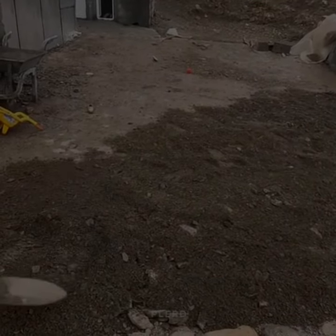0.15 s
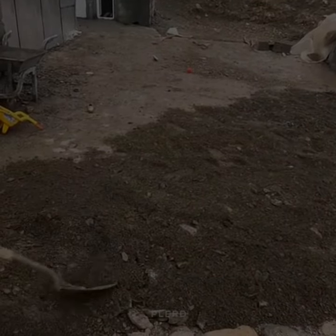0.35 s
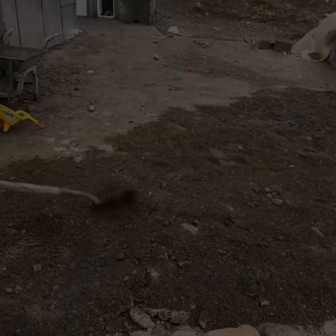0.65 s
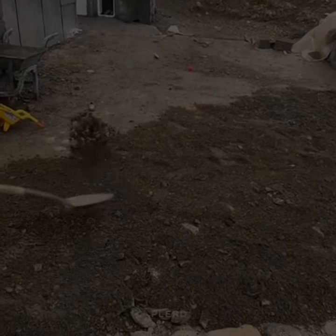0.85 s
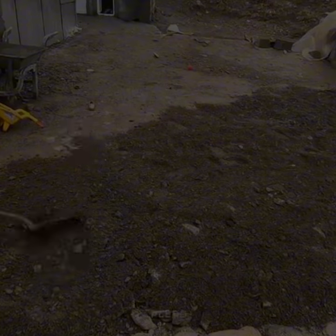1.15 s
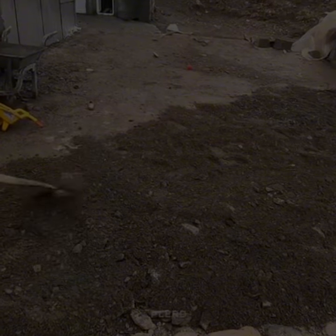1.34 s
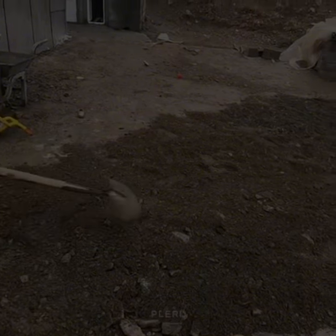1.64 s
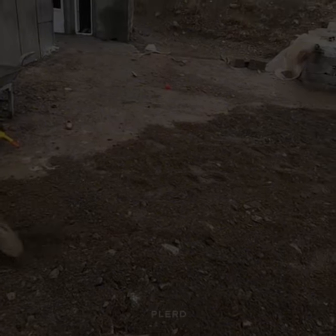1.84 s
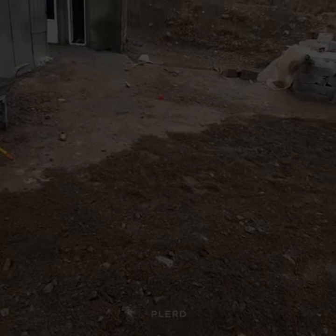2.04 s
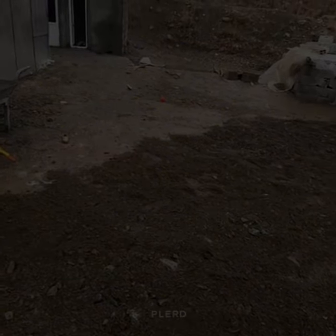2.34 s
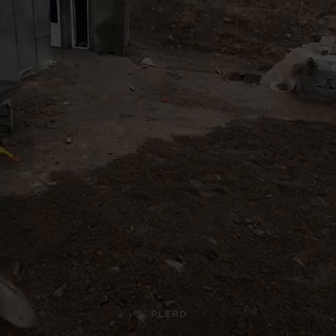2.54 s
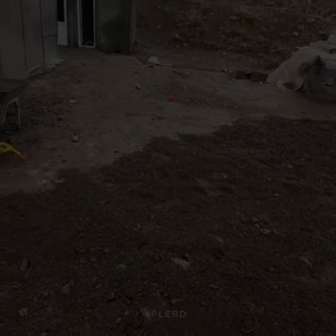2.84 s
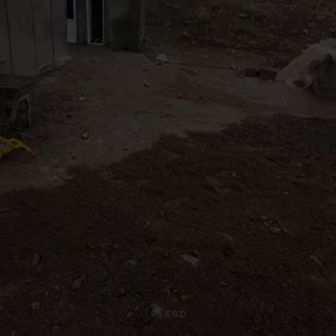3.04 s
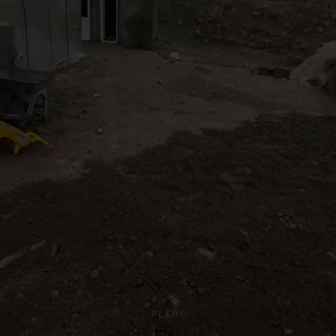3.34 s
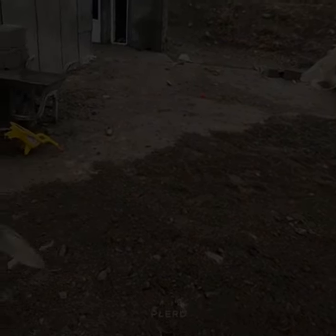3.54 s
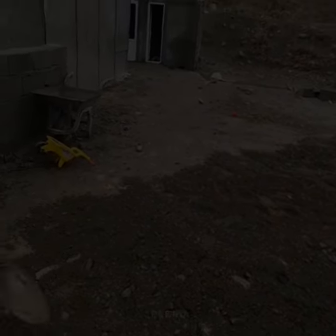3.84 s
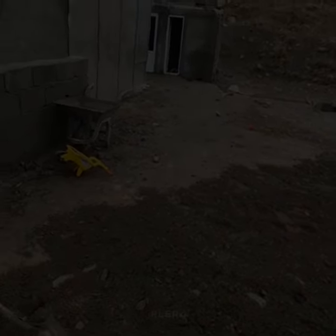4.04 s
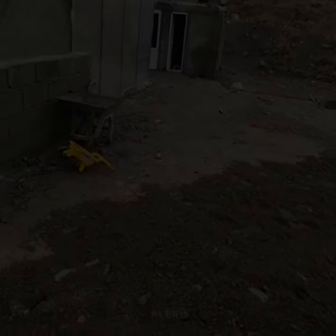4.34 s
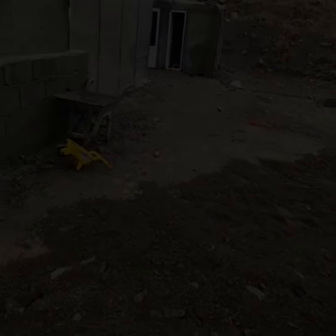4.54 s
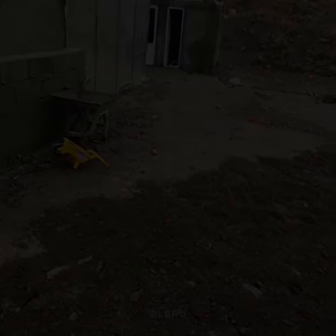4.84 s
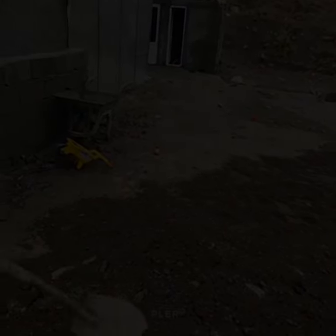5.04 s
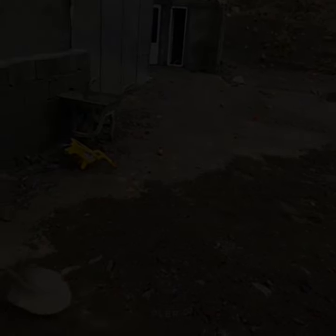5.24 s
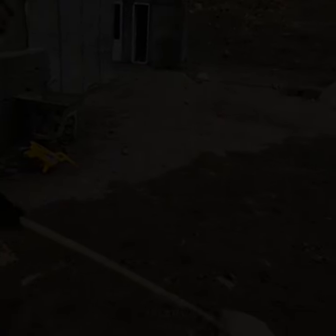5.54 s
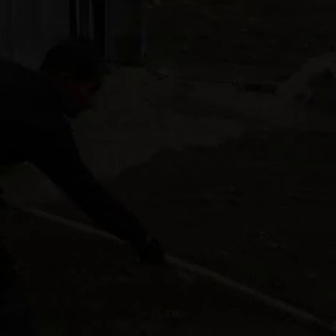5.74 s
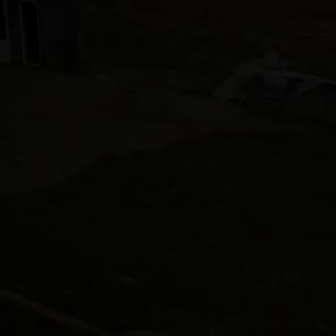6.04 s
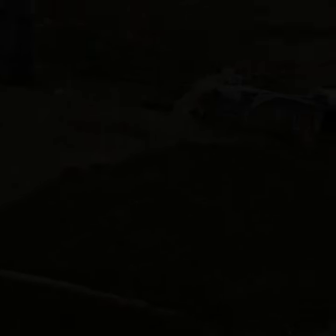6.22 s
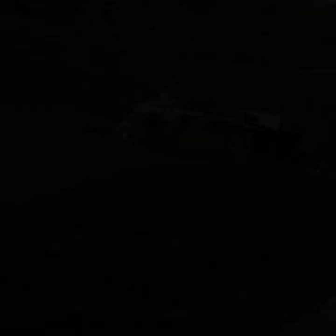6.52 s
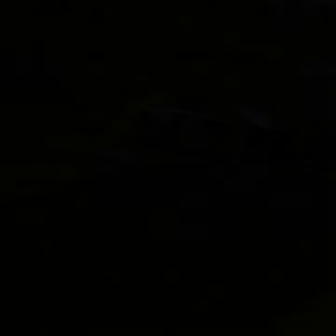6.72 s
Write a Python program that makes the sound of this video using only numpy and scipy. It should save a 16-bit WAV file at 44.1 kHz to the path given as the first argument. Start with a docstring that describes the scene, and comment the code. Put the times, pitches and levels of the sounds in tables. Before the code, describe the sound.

A shovel tosses loose earth that patters down, then crunches through gravelly soil, stones clicking on steel, ending in a long gritty scrape.

```python
"""Shovel in gravelly soil

A steel shovel works gravelly soil in an open yard, a few steps from the microphone.
First loose earth is tossed and lands with a dull patter; then the gravel crunches in short bursts,
stones click on the blade, and near the end a long scrape drags grit over the ground.
Contacts are filtered noise and tiny impulses; the ringing steel and soft thumps are decaying sines."""
import sys
import numpy as np
from scipy import signal
from scipy.fft import rfft, irfft, next_fast_len
from scipy.io import wavfile
from scipy.ndimage import uniform_filter1d, map_coordinates

SR = 44100
rng = np.random.default_rng(int(sys.argv[2]) if len(sys.argv) > 2 else 0)


def master_out(mix):
    """Clip the mix to full scale and print it as 16-bit PCM to the path in sys.argv[1]."""
    frames = np.transpose(np.atleast_2d(mix))
    ceiling = np.clip(frames, -1, 1)
    pcm = np.round(ceiling * 32767).astype(np.int16)
    wavfile.write(sys.argv[1], SR, pcm)


N = 303259

# The blade bites into gravel, and a stone may snap at the peak. Each row: peak time in seconds,
# relative level in dB, rise and fall in seconds per 60 dB, snap in dB over the level,
# relative thud, knock and grit in dB, stone resonance in Hz.
GRAVEL_BITES = [(0.028, -40, .05, .07, -10, 14, 2, 1, 2400), (1.463, -35, .03, .07, 14, -7, -4, -8, 1824),
                (1.598, -38, .045, .06, -11, -10, -1, -5, 2196), (1.834, -23, .04, .09, 1, -8, 0, 0, 2946),
                (1.944, -32, .045, .06, -11, -12, -4, -4, 1732),
                (1.997, -36, .06, .12, -10, 0, -7, 0, 2176), (2.143, -43, .04, .09, -8, -6, -2, 4, 4500),
                (2.311, -33, .035, .06, -10, 0, 0, 1, 1800), (2.423, -39, .04, .07, -8, -4, -3, 1, 2730),
                (2.465, -39, .03, .1, -8, -4, -3, 0, 1610), (2.683, -25, .028, .06, 2, -3, -5, 1, 2215),
                (3.077, -24, .045, .05, -8, 4, -1, 1, 1750), (3.114, -23, .026, .05, -10, -6, -4, -1, 1914),
                (3.128, -24, .06, .04, -5, 5, 1, -12, 2500), (3.375, -20, .036, .05, 4, -6, -2, -2, 2190),
                (3.389, -22.5, .06, .045, -11, -10, -9, -2, 1900),
                (3.435, -16, .045, .06, 0, 1, -2, -1, 2500), (3.479, -30, .034, .04, 0, 11, 7, -7, 1750),
                (3.736, -23, .06, .055, -2, -12, -3, -3, 2700),
                (3.772, -23, .04, .06, -3, -14, -3, -3, 1836),
                (4.095, -30, .025, .04, -10, -10, -6, 6, 2150), (4.108, -26, .04, .035, 6, -5, -5, 5, 2147),
                (4.213, -36, .025, .06, -6, -12, -1, -2, 1850), (4.2637, -20, .06, .05, 9, 7, 2, -4, 2040),
                (4.672, -16, .04, .06, -6, 14, 2, -2, 1800), (4.682, -18, .035, .045, -6, 11, 1, -5, 2460),
                (4.879, -24, .035, .05, -10, -2, 2, -4, 1750), (4.8855, -20, .012, .05, 7, 3, 0, -5, 3230),
                (5.202, -23, .05, .08, 1, -1, -5, 4, 4210), (5.259, -40, .12, .13, -12, -2, 2, -1, 1800),
                (5.5603, -25, .06, .05, 10, -8, 8, 1, 1000), (5.606, -36, .04, .2, -12, -10, -3, -2, 2700),
                (5.706, -31, .04, .16, -10, -4, 0, -1, 2700), (5.846, -25, .034, .05, 8, 0, 4, -3, 2434),
                (5.984, -26, .03, .1, -8, -1, 0, 0, 3430), (6.065, -26, .02, .07, -6, -15, -10, 1, 1770),
                (6.227, -31, .06, .07, -6, 1, 1, 5, 7700), (6.294, -25, .03, .09, 7, -14, -2, 3, 4400),
                (6.332, -20, .016, .085, -2, 3, 8, -3, 1820), (6.512, -26, .12, .06, -2, -18, -2, 2, 1616)]


def crunches():
    """Gravel gives way under the blade in short bursts, with a brighter snap where the load peaks."""
    out = np.zeros((2, N))
    for s, db, rise, fall, snap_db, thud_db, knock_db, grit_db, stone_hz in GRAVEL_BITES:
        tone = stones(thud_db, knock_db, grit_db, stone_hz, peak_db=6.0, width_hz=170, uneven_db=3.5)
        crunch = colour(burst(db - 2, rise, fall), tone)
        add(out, s - rise, crunch)
        add(out, s, snap(db + snap_db, thud_db, knock_db, grit_db + 2.1, stone_hz))
    return out


def burst(db, rise, fall):
    """A cloud of fractures that swells for rise seconds and dies."""
    t = np.arange(-rise, fall + .02, 1 / SR)
    swell = amp(db - 60 * np.maximum(-t / rise, t / fall))
    cloud = fractures(SR // 2, rate=5500, scatter_db=3.5, dust=0.562)[:, :len(t)]
    return spread(cloud, side_db=-8) * swell[:SR // 2]


SNAP_S = 0.013  # chatter of a snap, seconds per 60 dB


def snap(db, thud_db, knock_db, grit_db, stone_hz):
    """A stone snaps: one sharp push and a few milliseconds of chatter."""
    t = np.arange(SR // 20) / SR
    chatter = rng.standard_normal((2, len(t))) * amp(-3 - 60 * t / SNAP_S)
    chatter[0, 0] -= 3.5  # the sharp push, common to both sides
    tone = stones(thud_db, knock_db, grit_db, stone_hz, peak_db=6.5, width_hz=238, uneven_db=3.0)
    return colour(amp(db - 1) * spread(chatter, side_db=-10), tone)


# Basic colour of gravel contacts. Each row: frequency in Hz, relative gain in dB.
GRAVEL_COLOUR = [(30, -31.5), (80, -17.5), (150, 1.5), (300, 0), (520, 0), (800, -0.5), (2100, 1),
                 (3400, -2), (5400, -7), (6600, -6), (7900, -3.5), (8700, -10.5), (9800, -24.5),
                 (13000, -31.5), (15700, -46.5)]


def stones(thud_db, knock_db, grit_db, stone_hz, peak_db, width_hz, uneven_db):
    """Colour of one contact: ground thud, bright grit, one main resonance and many chance ones."""
    tilt = [(200, thud_db), (420, (thud_db + knock_db) / 2), (650, knock_db), (1100, knock_db),
            (1700, 0), (3800, 0), (5500, grit_db)]
    chance = rng.standard_normal(256)
    half_width = width_hz * np.sqrt(stone_hz / 2000)

    def level(hz):
        resonance = peak_db / (1 + ((hz - stone_hz) / half_width) ** 2)
        # small stones have no low resonances
        ripple_db = uneven_db * np.minimum(hz / 1800, 1)
        ripple = ripple_db * map_coordinates(chance, [hz / 130], mode="wrap")
        return along(GRAVEL_COLOUR, hz) + along(tilt, hz) + resonance + ripple

    return level


CLICK_THUD_DB = -7.5  # a lone stone hardly shakes the ground
# Lone stones striking. Each row: start in seconds, relative level in dB,
# relative knock and grit in dB, stone resonance in Hz.
STONE_CLICKS = [(0.37, -32, -2, -6, 3000), (0.438, -38, 0, -12, 2900), (0.612, -40, -2, -8, 3100),
                (0.732, -32, 0, -12, 3560), (0.753, -38, 0, -12, 2600), (1.018, -37, 0, -8, 3600),
                (1.074, -25, -6, -16, 3130), (1.15, -22, 5, -14, 2900), (1.838, -18, -2, 0, 2950),
                (2.432, -33, -8, 5, 5600), (2.715, -24, -7, 1, 3290), (3.938, -39, -1, 7, 5600),
                (4.161, -36, -8, 7, 6800), (4.27, -19, 6, -4, 1300), (5.578, -24, 13, 0, 1100),
                (5.883, -21, -1, -1, 4300), (6.289, -18, -12, 3, 3900), (6.329, -14, 5, -8, 2400),
                (6.5665, -10, -14, 2, 3980), (6.595, -17, -13, 8, 4200)]


def clicks():
    """Lone stones strike the blade or each other, each with one snap."""
    out = np.zeros((2, N))
    for s, db, knock_db, grit_db, stone_hz in STONE_CLICKS:
        add(out, s, snap(db, CLICK_THUD_DB, knock_db, grit_db, stone_hz))
    return out


BLOW_S = .045  # the ground's shudder, seconds per 60 dB
# Hard blows of the blade on firm ground, which also ring the steel in blade().
# Each row: start in seconds, relative ring in dB, relative thud in dB.
HARD_BLOWS = [(4.264, -50, -8), (4.676, -48, -3), (4.886, -34, 4), (5.203, -41.5, -24), (5.561, -38.5, -16),
              (6.33, -48.5, -18), (6.566, -39.5, -27.5)]
# Colour of the struck ground. Each row: frequency in Hz, relative gain in dB.
THUD_COLOUR = [(40, -25.5), (100, -8.5), (170, 4), (270, 7), (420, 1), (900, -4.5), (2000, -17),
               (6000, -16.5), (12000, -58)]


def thuds():
    """A hard blow gives the ground one heavy push and a short shudder."""
    out, t = np.zeros((2, N)), np.arange(SR // 12) / SR
    for s, ring_db, thud_db in HARD_BLOWS:
        push = rng.standard_normal((2, len(t))) * amp(-18 - 60 * t / BLOW_S)
        push[0, 0] += 3.5  # the heavy push, common to both sides
        thud = colour(amp(thud_db) * spread(push, side_db=-11), lambda hz: along(THUD_COLOUR, hz))
        add(out, s, thud)
    return out


# The blade grinds over a stone and sings. Each row: peak time in seconds, relative level in dB,
# rise and fall of the driving noise in seconds per 60 dB, favoured frequency in Hz.
STONE_GRINDS = [(1.073, -42, .04, .05, 3130), (1.832, -40, .04, .2, 3130), (3.113, -34, .02, .09, 1860),
                (3.371, -26, .03, .05, 1250), (3.386, -27, .06, .045, 2240), (3.434, -30, .04, .09, 3455),
                (3.736, -33, .06, .04, 2240), (3.774, -35, .04, .05, 1860), (4.095, -36, .03, .07, 7910),
                (4.874, -26.5, .04, .08, 3200), (5.21, -44, .05, .3, 4390), (5.574, -32, .1, .08, 860),
                (5.996, -39, .06, .08, 715), (6.51, -35, .1, .05, 1650)]


def blade():
    """The steel sings in damped bursts as it grinds over stones, and rings freely after hard blows."""
    out = np.zeros((2, N))
    for s, db, rise, fall, focus_hz in STONE_GRINDS:
        ring = blade_ring(focus_hz, SOIL_DAMPING)
        add(out, s - rise, signal.fftconvolve(burst(db, rise, fall), ring, axes=1))
    for s, ring_db, thud_db in HARD_BLOWS:
        ring = blade_ring(focus_hz=1600, damping=1)
        add(out, s, amp(ring_db + 4) * ring / np.abs(ring).max())
    return out


FOCUS_DB_PER_OCTAVE = 28  # the point of contact picks out the modes near one frequency
SOIL_DAMPING = 1.7  # how much faster the blade dies away when pressed into the ground
# Modes of the steel blade. Each row: frequency in Hz, relative level in dB,
# free decay in seconds per 60 dB.
BLADE_MODES = [(715, -3, .07), (860, -3, .06), (1210, -2, .07), (1600, 1, .14), (1860, -1, .06),
               (2240, 0, .07), (3130, -2, .04), (3290, -1, .06), (3455, -1, .06), (4390, -1, .08),
               (7910, -2, .04)]


def blade_ring(focus_hz, damping):
    """Ring of the blade, of energy 1, touched where the modes near focus_hz answer best."""
    t = np.arange(SR // 5) / SR
    ring = np.zeros(len(t))
    for hz, db, t60 in BLADE_MODES:
        level = db + rng.normal(0, 1.5) - FOCUS_DB_PER_OCTAVE * abs(np.log2(hz / focus_hz))
        ring += amp(level - 60 * t * damping / t60) * np.sin(2 * np.pi * hz * t)
    return ring[None] / np.linalg.norm(ring)


# Colour of running soil. Each row: frequency in Hz, relative gain in dB.
SOIL_COLOUR = [(100, -14.5), (400, -5), (900, -2), (1300, 0), (2000, 0), (3200, -0.5), (4500, -3.5),
               (6200, -9.5), (7500, -24.5), (10000, -31.5), (13000, -27.5), (15700, -53.5)]
# Colour of fine grit. Each row: frequency in Hz, relative gain in dB.
GRIT_COLOUR = [(1000, -33.5), (3500, -11.5), (5400, -6.5), (6600, -4.5), (7900, -2), (8600, -8.5),
               (9800, -24.5), (13000, -30.5), (15700, -44.5)]
# Resonances of the loaded blade under a scrape. Each row: frequency in Hz, half-width in Hz, boost in dB.
SCRAPE_MODES = [(556, 21.5, 2), (712, 30, 5), (1794, 84, 5.5), (2273, 70, 5), (2690, 34, 3),
                (3230, 94, 3.5), (4284, 54, 2.5), (7680, 150, 1.5)]


def sliding(soil_gain, grit_gain):
    """Earth and fine grit run over the blade and the ground in uneven clumps."""
    clumps_db = 2.0 * wobble(35) + 1.92 * wobble(260)
    soil = spread(fractures(N, rate=900, scatter_db=4.5, dust=0.6), side_db=-4.5)
    soil = soil * soil_gain * amp(clumps_db - 2.5)
    grit = spread(fractures(N, rate=1200, scatter_db=4, dust=0.7), side_db=-6.5)
    grit = grit * grit_gain * amp(clumps_db - 1.5)

    def steel(hz):
        return sum(db / (1 + ((hz - centre) / width) ** 2) for centre, width, db in SCRAPE_MODES)

    soil = colour(soil, lambda hz: along(SOIL_COLOUR, hz) + steel(hz))
    grit = colour(grit, lambda hz: along(GRIT_COLOUR, hz) + steel(hz))
    return shifting(soil + grit, depth_db=3.0)


def shifting(x, depth_db):
    """Changing contacts bring out narrow resonances for a few hundredths of a second each."""
    z = signal.stft(x, nperseg=512)[2]
    field = uniform_filter1d(rng.standard_normal(z.shape[1:]), size=2, axis=0)  # blur over frequency
    field = uniform_filter1d(field, size=8, axis=1)  # blur over time
    return signal.istft(z * amp(depth_db * unit(field)), nperseg=512)[1][:, :N]


DIG_START_S = 1.46
TRICKLE_DB, TRICKLE_GRIT_DB = -61.5, -68  # relative: soil and grit that keep trickling while digging
CONTACT_DB, CONTACT_GRIT_DB = -44.5, -43  # relative: while the blade stays down between pushes
POUR_RISE_S, POUR_FALL_S = 0.152, 0.361  # seconds per 60 dB: material starts to run, and runs out
POUR_SAG_DB_PER_S = 20  # a spill thins out as the load runs down
# A push takes these seconds per 60 dB to start and stop, and loses force as it goes.
PUSH_RISE_S, PUSH_FALL_S, PUSH_SAG_DB_PER_S = .07, .19, 42
# Gravelly soil spills off the blade. Each row: start in seconds, length in seconds,
# relative level in dB, fine grit in dB over the level.
SOIL_SPILLS = [(1.475, 0.093, -55, -3), (1.854, 0.0315, -43.5, -2.5), (1.951, 0.059, -53, 2),
               (2.097, 0.0685, -54.5, 1.5), (2.337, 0.1434, -49.5, 0), (2.423, 0.039, -49.5, 3.5),
               (2.717, .07, -48.5, 1.5), (2.88, 0.07, -46.5, -2), (3.042, 0.1186, -52.5, 3),
               (3.781, 0.051, -53.5, 0), (4.15, .13, -51, -0.5), (4.41, 0.019, -50, 2),
               (4.485, .025, -45, 2), (5.101, 0.031, -68.5, 8.5), (5.214, 0.0332, -43, 0),
               (5.424, 0.195, -55.5, 2.5), (6.779, .1, -56.5, 3)]
# Pushes of the long scrape. Each row: start in seconds, length in seconds,
# relative level in dB, fine grit in dB over the level.
SCRAPE_PUSHES = [(5.57, .1, -38, 0), (5.705, .09, -34.5, 4), (5.94, .07, -40, 2), (6.06, .08, -35.5, 7),
                 (6.215, .06, -37, 7), (6.3, .06, -36, 5), (6.47, .11, -40, 5), (6.62, .065, -36.5, 4)]


def flow():
    """Gains of moving soil and fine grit: a steady trickle, the spills and the pushes of the long scrape."""
    trickle = pour(DIG_START_S, N / SR, POUR_RISE_S, POUR_FALL_S)
    first, last = SCRAPE_PUSHES[0][0], SCRAPE_PUSHES[-1][0]
    contact = pour(first, last - first, PUSH_RISE_S, PUSH_FALL_S)
    parts = [trickle * amp([[TRICKLE_DB], [TRICKLE_GRIT_DB]]),
             contact * amp([[CONTACT_DB], [CONTACT_GRIT_DB]])]
    for s, length, db, grit_db in SOIL_SPILLS:
        spill = pour(s, length, POUR_RISE_S, POUR_FALL_S, POUR_SAG_DB_PER_S)
        parts.append(spill * amp([[db], [db + grit_db]]))
    for s, length, db, grit_db in SCRAPE_PUSHES:
        push = pour(s, length, PUSH_RISE_S, PUSH_FALL_S, PUSH_SAG_DB_PER_S)
        parts.append(push * amp([[db], [db + grit_db]]))
    return np.sqrt(sum(part ** 2 for part in parts))


def pour(s, length, rise, fall, sag=0):
    """Gain of running material: it swells up to time s, sags by sag dB a second for length and runs out."""
    t = np.arange(N) / SR - s
    edges = np.clip(np.maximum(-t / rise, (t - length) / fall), 0, 2)
    return amp(-60 * edges - sag * np.clip(t, 0, length))


def pebbles(soil_gain, count=120):
    """Loose pebbles tick here and there, louder when more soil is moving."""
    out, t = np.zeros((2, N)), np.arange(SR // 50) / SR
    for when, weight, pitch in rng.random((count, 3)):
        tick = spread(rng.standard_normal((2, len(t))), side_db=-12) * amp(-60 * t / 0.0063)
        level = soil_gain[int(when * N)] * amp(2 + 8 * weight)
        tone = stones(-13, -2, 2.07, 1600 + 4000 * pitch, peak_db=8, width_hz=290, uneven_db=4)
        add(out, when * N / SR, colour(level * tick, tone))
    return out


CRUMBS_DB, CRUMBS_S = -56.5, 1.36  # relative level of crumbs that keep falling, and for how long
TOSS_RISE_S, TOSS_FALL_S = .1, .2  # seconds per 60 dB: tossed earth starts and stops landing
CLOD_RISE = .42  # share of a clod's length spent swelling
# Tossed earth comes down. Each row: start in seconds, length in seconds, relative level in dB.
EARTH_TOSSES = [(0.0, .032, -50), (0.125, .065, -50), (0.32, .08, -43), (0.445, .09, -43),
                (0.618, .025, -51), (0.79, .065, -50), (1.06, .07, -47), (1.157, .028, -38.5),
                (1.2, .035, -45.5), (1.33, .025, -51)]
# Clods of tossed earth landing. Each row: peak time in seconds, relative level in dB,
# length in seconds per 60 dB (a negative length is silent), relative weight in dB.
EARTH_CLODS = [(0.37, -37, .25, 3), (0.732, -42.5, 0.37, 5), (1.02, -39.5, -0.86, 5), (1.104, -30, .035, 7),
               (1.114, -27, .07, 6)]
# Colour of loose earth. Each row: frequency in Hz, relative gain in dB.
EARTH_COLOUR = [(100, -8), (400, 2.5), (900, 3.5), (1500, 2), (2200, 1), (3100, 1.5), (4500, -4),
                (6200, -10.5), (7500, -20), (10000, -27), (13000, -26.5), (15700, -44.5)]


def tossed_earth():
    """A shovelful lands as dull clods in a patter of crumbs."""
    power = (amp(CRUMBS_DB) * pour(0, CRUMBS_S, POUR_RISE_S, POUR_FALL_S)) ** 2
    for s, length, db in EARTH_TOSSES:
        power += (amp(db) * pour(s, length, TOSS_RISE_S, TOSS_FALL_S, POUR_SAG_DB_PER_S)) ** 2
    crumbs = spread(fractures(N, rate=3200, scatter_db=5, dust=0.64), side_db=-7.5)
    out = crumbs * np.sqrt(power) * amp(1.6 * wobble(39.9) - 1.9)
    for s, db, length, weight_db in EARTH_CLODS:
        weight = [(250, weight_db + 1.5), (650, weight_db - 2), (1100, weight_db - 2.5), (1700, 0)]
        rise = length * CLOD_RISE
        clod = colour(burst(db - 1.5, rise, length - rise), lambda hz: along(weight, hz))
        add(out, s - rise, clod)
    return colour(out, lambda hz: along(EARTH_COLOUR, hz))


# Soft thumps of weight on the ground. Each row: start in seconds, relative level in dB, pitch in Hz.
SOFT_THUMPS = [(0.002, -32, 190), (0.004, -36, 330), (0.019, -36.5, 144.3), (0.254, -39.5, 189),
               (0.299, -36, 145.7), (1.057, -38, 51), (1.244, -31, 127.8), (1.31, -38, 85),
               (1.389, -38.5, 51), (2.289, -41, 58.6), (2.448, -35, 51.4), (3.499, -41, 122),
               (4.666, -23, 140), (5.329, -37, 52.8), (6.541, -29.5, 112)]


def thumps():
    """Soft weight lands on the earth: a few slow cycles."""
    out, t = np.zeros((2, N)), np.arange(SR // 4) / SR
    for s, db, hz in SOFT_THUMPS:
        onset = 1 - np.exp(-t / 0.00613)
        push = np.sin(2 * np.pi * hz * t) * onset * amp(db + 6.5 - 60 * t / 0.079)
        add(out, s, np.array([push, push]))
    return out


# Weak answer of the yard. Each row: frequency in Hz, decay in seconds per 60 dB.
YARD_DECAY = [(200, 0.23), (2000, 0.17), (10000, .12)]


def yard(x):
    """The walls round the yard answer weakly; treble dies first."""
    hz, t, z = signal.stft(rng.standard_normal((2, SR // 3)), SR, nperseg=256)
    decay = amp(-60 * t / along(YARD_DECAY, hz)[:, None])
    tail = signal.istft(z * decay, SR, nperseg=256)[1]
    return signal.fftconvolve(x, tail / np.linalg.norm(tail[0]), axes=1)[:, :N]


DEEP_DB, UPPER_DB, HISS_DB = 5.5, 1, -62  # trims of the two rumble layers; hiss before spreading
# Level of the low rumble as heard, which dips and comes back over time.
# Each row: time in seconds, relative upper level in dB, relative deep level in dB.
RUMBLE_LEVELS = [(0.0, -55, -57.5), (0.75, -55.5, -70), (1.4, -52.5, -56.5), (1.68, -55.5, -69.5),
                 (3.58, -56, -62.5), (3.73, -59.5, -68.5), (4.48, -55.5, -73), (4.82, -63.5, -82),
                 (6.03, -54.5, -62.5), (6.88, -59.5, -72)]
# Colour of the deep rumble. Each row: frequency in Hz, relative gain in dB.
DEEP_COLOUR = [(15, -9), (42, 0.5), (75, -6), (110, -9), (200, -29.5), (600, -79)]
# Colour of the upper rumble. Each row: frequency in Hz, relative gain in dB.
UPPER_COLOUR = [(30, -31), (90, -8.5), (150, 0), (220, -3.5), (320, -9.5), (500, -17.5), (900, -29.5),
                (3000, -76.5)]
# Colour of the hiss. Each row: frequency in Hz, relative gain in dB.
HISS_COLOUR = [(100, 1.5), (500, -3.5), (800, -0.5), (1600, 1.5), (3000, -12), (5000, -17), (8000, -23),
               (10000, -36), (13000, -34.5), (15700, -51)]


def background():
    """Low rumble that dips and comes back, and a faint even hiss, all filtered noise."""
    def noise(spectrum):
        return unit(colour(rng.standard_normal((2, N)), lambda hz: along(spectrum, hz), size=8192))

    upper_db, deep_db = curves(RUMBLE_LEVELS)
    deep = noise(DEEP_COLOUR) * amp(deep_db + DEEP_DB + 3.56 * wobble(14))
    upper = noise(UPPER_COLOUR) * amp(upper_db + UPPER_DB + 1.97 * wobble(22))
    hiss = amp(HISS_DB) * spread(noise(HISS_COLOUR), side_db=-1.5)
    return spread(deep + upper, side_db=-8) + hiss


def fractures(n, rate, scatter_db, dust):
    """Tiny contacts of scattered size, rate a second, over the smooth hiss of dust; rms 1."""
    present = rng.random(n) < rate / SR
    sizes = present * amp(scatter_db * np.minimum(rng.standard_normal(n), 2))
    contacts = unit(sizes * rng.choice([-1, 1], (2, n)))
    return unit(contacts + dust * rng.standard_normal((2, n)))


def amp(db):
    """Decibels to gain."""
    return 10 ** (np.asarray(db) / 20)


def unit(x):
    """Scaled to rms 1."""
    return x / np.sqrt(np.mean(x ** 2) + 1e-20)


def along(points, hz):
    """(Hz, value) points read on a log axis."""
    f, v = np.transpose(points)
    return np.interp(np.log(hz + 1), np.log(f + 1), v)


def curves(rows):
    """One value per sample for each column after the time."""
    s, *cols = np.transpose(rows)
    return [np.interp(np.arange(N) / SR, s, c) for c in cols]


def wobble(rate):
    """A smooth random curve, about rate turns a second."""
    steps = np.arange(0, N * rate / SR + 1, 1 / 4)
    smooth = map_coordinates(rng.standard_normal(len(steps)), [steps])
    return np.interp(np.arange(N) * rate / SR, steps, smooth)


def colour(x, level, size=1024):
    """x through the causal filter whose gain in dB is level(Hz)."""
    cepstrum = irfft(np.log(amp(level(np.fft.rfftfreq(size, 1 / SR)))))
    # folding the cepstrum forward gives minimum phase
    cepstrum[1:size // 2] *= 2
    cepstrum[size // 2 + 1:] = 0
    impulse = irfft(np.exp(rfft(cepstrum)))
    m = next_fast_len(x.shape[1] + size, True)
    return irfft(rfft(x, m) * rfft(impulse, m), m)[:, :x.shape[1]]


def add(track, s, sound):
    """Mix a stereo sound in from time s on."""
    start = round(s * SR)
    a, b = max(start, 0), min(start + sound.shape[1], N)
    track[:, a:b] += sound[:, a - start:b - start]


def spread(pair, side_db):
    """Left and right from a common and a differing signal."""
    mid, side = pair[0], amp(side_db) * pair[1]
    return np.array([mid + side, mid - side])


def scene():
    """The digging sits slightly to the left; the yard answers it, over thumps and background."""
    soil_gain, grit_gain = flow()
    scraping = sliding(soil_gain, grit_gain) + pebbles(soil_gain)
    digging = crunches() + clicks() + thuds() + scraping + blade()
    work = digging * amp([[.6], [-.6]]) + tossed_earth()
    return work + amp(-25.5) * yard(work) + thumps() + background()


TOP_HZ = 15750  # band limit
# Stereo width: wide, then narrow, then opening as the digging starts.
# Each row: time in seconds, side gain in dB.
STEREO_WIDTH = [(0, 0.5), (.7, -27.5), (1.15, -32.5), (1.45, -3.5), (2.1, 1.5), (6.88, 2)]
# Side signal of the two microphone ports. Each row: frequency in Hz, side gain in dB.
PORT_SIDE = [(40, 1.5), (200, -5), (800, -1.5), (2000, 0.5), (8000, -.8), (11000, 4.5)]
# The left port hears more of the top treble. Each row: frequency in Hz, left over right in dB.
LEFT_TREBLE = [(8500, 0), (11000, 3.5)]


def record(dry):
    """Two close ports set the stereo width; nothing is kept above the band limit."""
    mid = (dry[0] + dry[1]) / 2
    side = colour((dry[:1] - dry[1:]) / 2, lambda hz: along(PORT_SIDE, hz))[0]
    pair = spread([mid, side], side_db=curves(STEREO_WIDTH)[0])
    m = next_fast_len(N + SR // 2)
    hz = np.fft.rfftfreq(m, 1 / SR)
    balance = amp(np.outer([.5, -.5], along(LEFT_TREBLE, hz)))
    return irfft(rfft(pair, m) * balance * (hz < TOP_HZ), m)[:, :N]


dry = scene()
out = record(dry)
master_out(out)
```